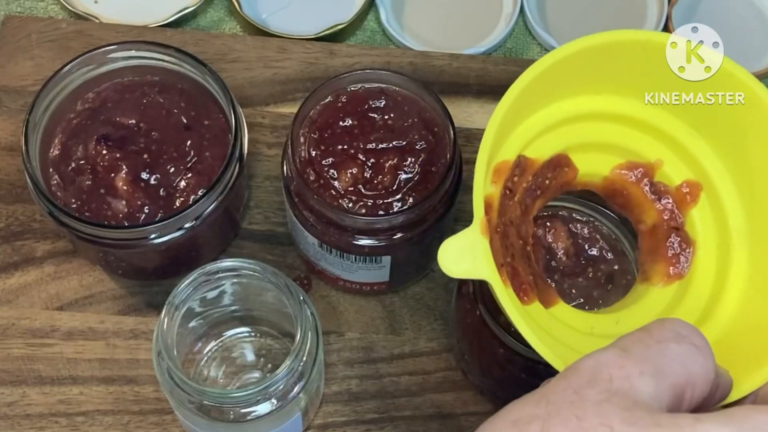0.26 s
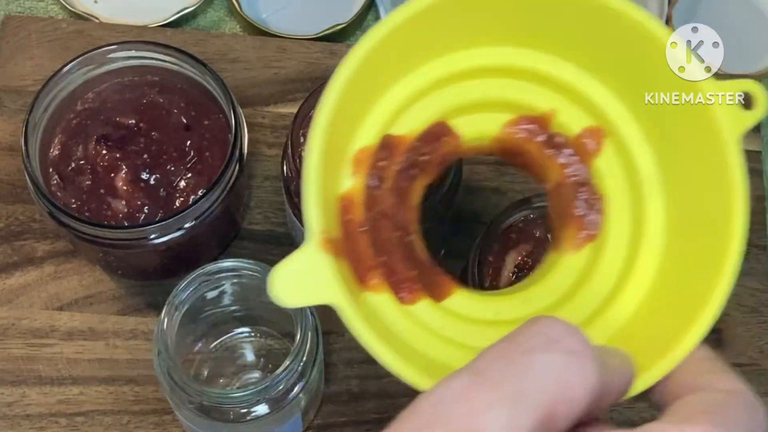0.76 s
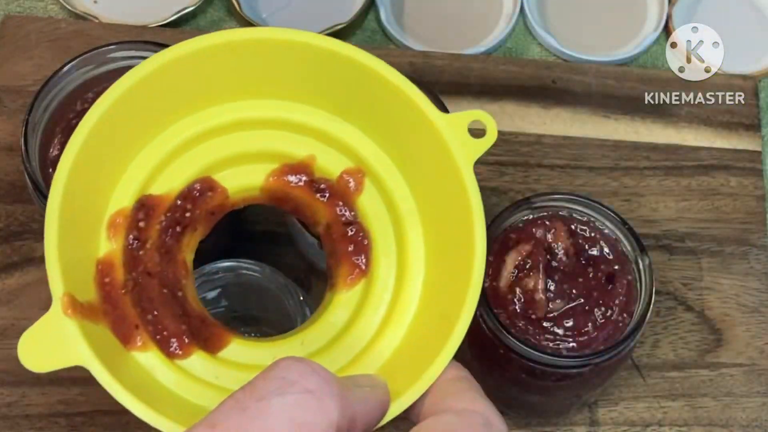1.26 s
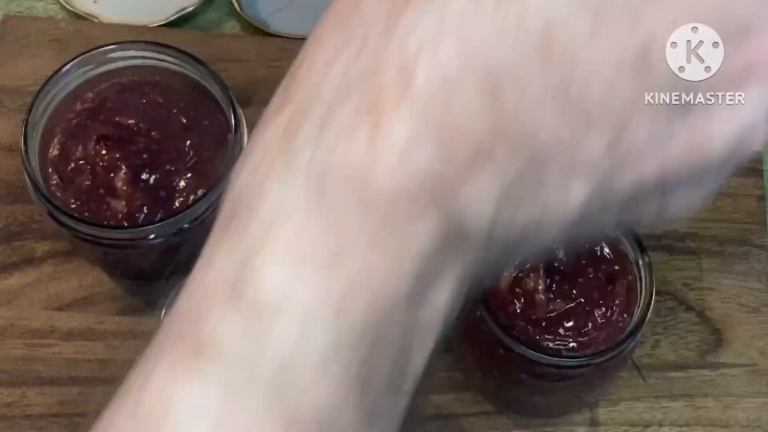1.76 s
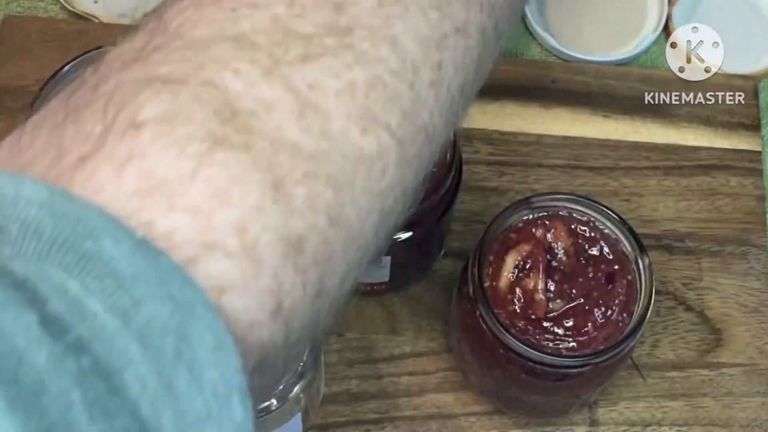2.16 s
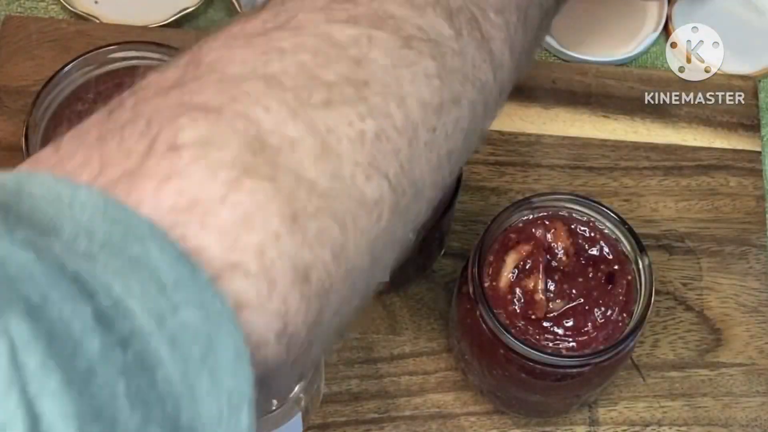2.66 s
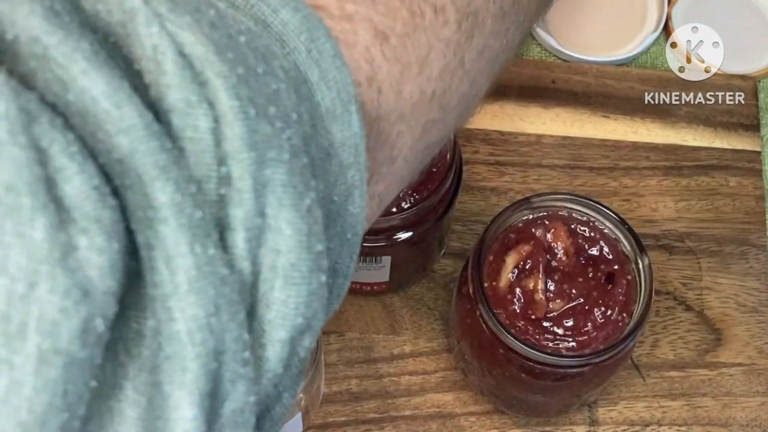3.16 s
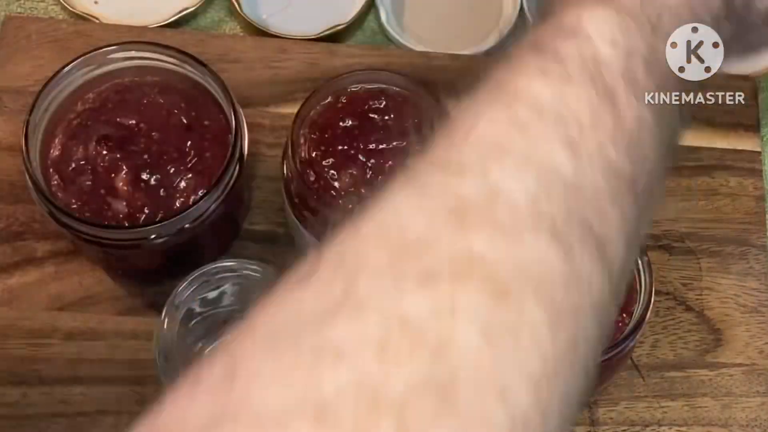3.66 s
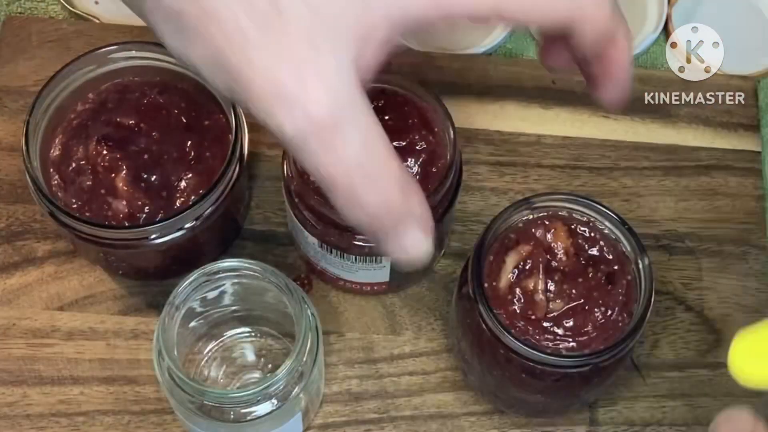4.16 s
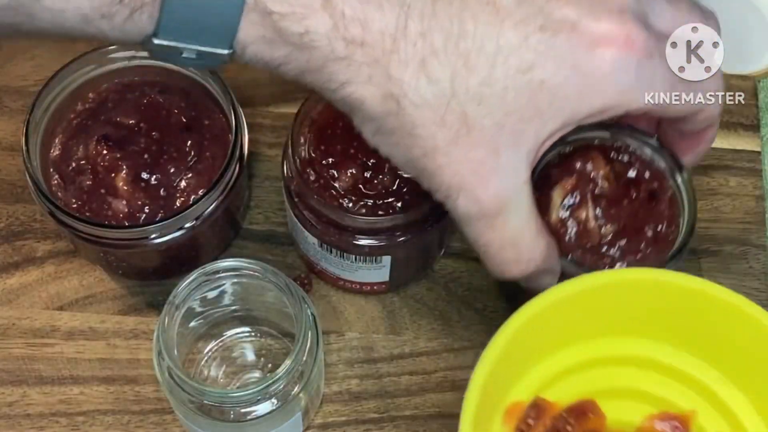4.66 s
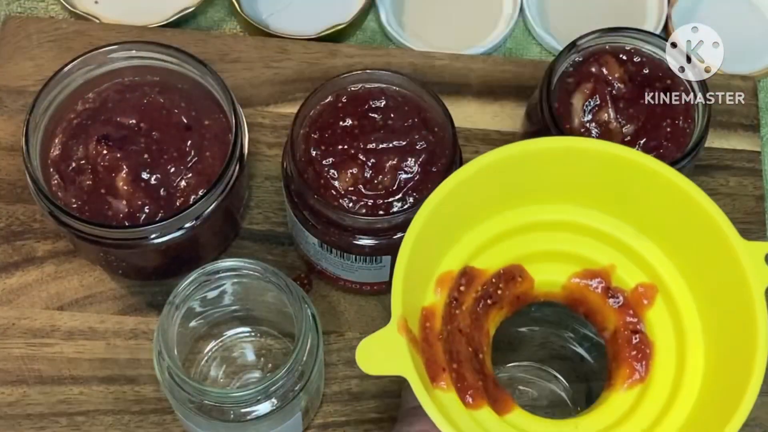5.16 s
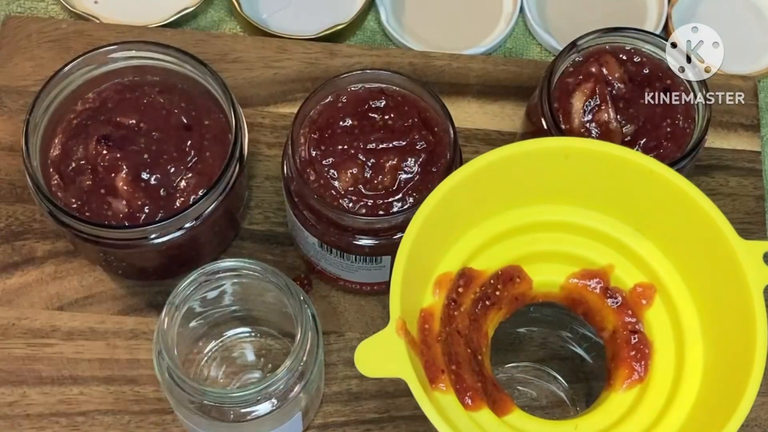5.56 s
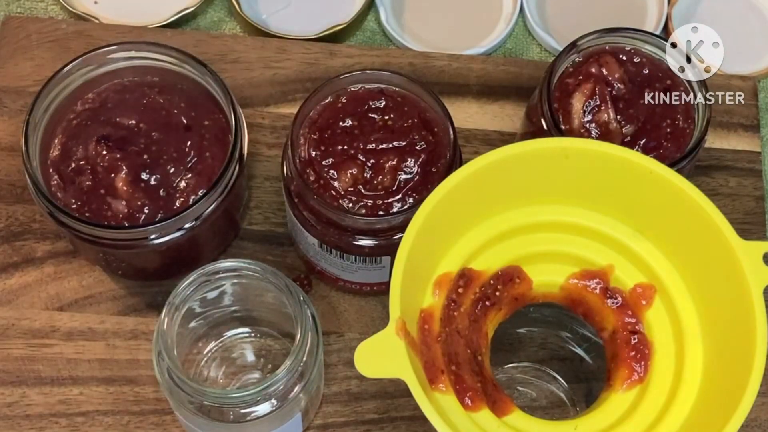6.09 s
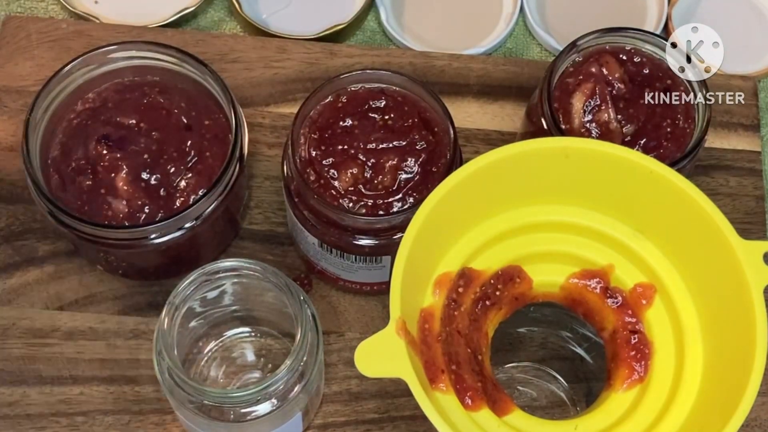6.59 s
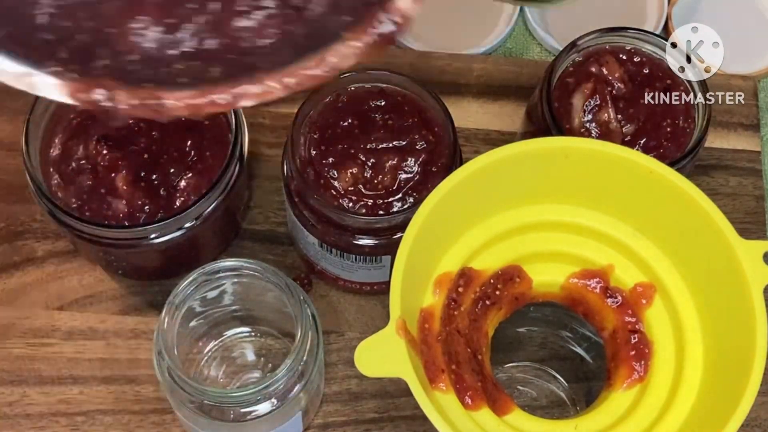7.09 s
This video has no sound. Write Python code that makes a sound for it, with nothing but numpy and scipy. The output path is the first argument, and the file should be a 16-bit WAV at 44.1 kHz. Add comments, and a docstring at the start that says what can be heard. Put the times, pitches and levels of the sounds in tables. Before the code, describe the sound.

Hollow knocks, a bright clatter and light taps, then a jar rasping along wood to a hard clink, softer thuds and ticks over low hum.

```python
"""Jam jars and a plastic funnel are moved about on a wooden board in a small kitchen; an appliance drones softly.
The funnel knocks on a jar, a faint airy fizz swells, things clatter down to one side, light taps and a scuff follow.
A full jar is pushed back until it touches its neighbours; an empty one is set down and nudged; a few ticks end it.
Contacts are filtered clicks, weight is half-sine pushes on board modes, scrapes are random slips through
resonances; glass is decaying sines, drone and hiss are shaped noise, and the room is a decaying stereo response."""
import sys
import numpy as np
from scipy import signal
from scipy.fft import rfft, irfft, next_fast_len
from scipy.io import wavfile
from scipy.ndimage import uniform_filter1d

SR = 44100
rng = np.random.default_rng(int(sys.argv[2]) if len(sys.argv) > 2 else 0)


def transcribe(u):
    """Save the signal u as a 16-bit wav file named by the first command-line argument.

    u: samples, shape (n,) or (channels, n), limited to [-1, 1]; the rate is SR.
    q: integer samples, one column per channel.
    """
    v = np.clip(np.atleast_2d(u).T, -1, 1)
    q = np.round(v * 32767).astype(np.int16)
    wavfile.write(sys.argv[1], SR, q)


N = 323253
PADDED = next_fast_len(N)
HZ = np.fft.rfftfreq(PADDED, 1 / SR)


def amp(db):
    """Decibels to gain."""
    return 10 ** (np.asarray(db) / 20)


def unit(x):
    """Scales to an rms of 1."""
    return x / np.sqrt(np.mean(x ** 2) + 1e-20)


def read(points, hz):
    """Reads a table on a log-frequency axis."""
    f, value = np.transpose(points)
    return np.interp(np.log(hz + 1), np.log(f + 1), value)


def add(mix, s, sound):
    """Adds a sound into the mix at time s."""
    part = mix[..., round(s * SR):][..., :sound.shape[-1]]
    part += sound[..., :part.shape[-1]]


def shaped(x, gain):
    """Filters a full-length signal by a gain for each frequency; rms 1."""
    return unit(irfft(rfft(x, PADDED) * gain, PADDED)[..., :N])


def convolved(x, response):
    """Passes a signal through a mono or stereo response."""
    return signal.fftconvolve(np.atleast_2d(x), np.atleast_2d(response), axes=1)[:, :N]


def noise_pair(same):
    """White noise in two channels with a given likeness at each frequency."""
    a, b = rfft(rng.standard_normal((2, PADDED)))
    same = np.clip(same, -1, 1)
    return irfft(np.array([a, same * a + np.sqrt(1 - same ** 2) * b]), PADDED)[:, :N]


def drift(hz):
    """Slow random motion up to a given rate; rms 1."""
    return shaped(rng.standard_normal(N), 1 / (1 + (HZ / hz) ** 4))


def background(hiss_db=-78.5, hiss_same=.3, waver_db=1.92, waver_hz=8):
    """The low drone of an appliance, wavering a little, and a smooth hiss."""
    # drone spectrum: hz, level_db
    drone_colour = [(25, -14.5), (40, -4.5), (50, 5.5), (62, -3), (95, -4), (130, -10), (300, -13.5),
                    (400, -11.5), (470, -4.5), (560, -4.5), (650, -11.5), (740, -23.5), (950, -23.5),
                    (2000, -91.5)]
    # left-right likeness of the drone: hz, likeness (-1 to 1)
    drone_same = [(60, 0.89), (150, 0.79), (380, 0.82), (950, 0.53), (2380, 0.59), (5980, -0.06),
                  (15000, 0.24)]
    # drone level before the waver: time_s, level_db
    drone_level = [(0, -62), (1.0, -63.5), (1.18, -68), (1.3, -58), (3.4, -59), (4.15, -61), (6.6, -56),
                   (7.2, -64)]
    # hiss spectrum: hz, level_db
    hiss_colour = [(300, -10), (900, 0), (1300, -1), (3000, -6), (7000, -7.5), (12000, -9), (14000, -13),
                   (16000, -18)]
    drone = shaped(noise_pair(read(drone_same, HZ)), amp(read(drone_colour, HZ)))
    level_db = np.interp(np.arange(N) / SR, *np.transpose(drone_level))
    hiss = shaped(noise_pair(hiss_same), amp(read(hiss_colour, HZ)))
    return amp(level_db + waver_db * drift(waver_hz)) * drone + amp(hiss_db) * hiss


def kitchen(x, first_s=.0013, early_db=5, early_s=0.0014, mono_hz=330):
    """Dense reflections from worktop and cupboards, then the room's tail; the bass is most alike on both sides."""
    # decay time of the room: hz, t60_s
    room_t60 = [(100, .45), (400, .44), (1500, .38), (4000, .32), (8000, .25), (15000, .19)]
    # spectrum of the room: hz, level_db
    room_colour = [(60, -16), (200, 0.5), (600, -18), (1500, -14), (4000, -12), (8000, -3.5), (15000, -6.5)]
    t = np.arange(SR * 3 // 4) / SR
    signs = rng.choice([-1., 1.], (2, len(t)))
    present = rng.random((2, len(t))) < 5000 / SR  # 5000 reflections per second
    taps = signs * present * (t > first_s)
    early = 1 + amp(early_db) * np.exp(-t / early_s)
    hz, when, z = signal.stft(taps * early, SR, nperseg=256)
    same = np.maximum(1 / (1 + (hz / mono_hz) ** 2), .25)[:, None]
    z[1] = same * z[0] + np.sqrt(1 - same ** 2) * z[1]
    z *= amp(read(room_colour, hz)[:, None] - 60 * when / read(room_t60, hz)[:, None])
    tail = signal.istft(z, SR, nperseg=256)[1]
    middle = abs(rfft(tail, SR))[:, 300:4000]  # 1 Hz bins: rms gain 1 over 300-4000 Hz
    return convolved(x, tail / np.sqrt(np.mean(middle ** 2)))


def strokes(rows, rise_s, stop_s):
    """Level of movements (start_s, end_s, level_db): each swells, holds and dies away."""
    t, power = np.arange(N) / SR, np.zeros(N)
    for start, end, db in rows:
        rise = np.sin(np.pi / 2 * np.clip((t - start) / rise_s, 0, 1)) ** 2
        stop = np.exp(-np.clip((t - end) / stop_s, 0, 20))
        power += (amp(db) * rise * stop) ** 2
    return np.sqrt(power)


def slips(per_s, spread_db, lumpy_db, lump_hz=35):
    """Tiny impulses, as of friction letting go, of random size, their size swelling in clumps."""
    lumps = drift(lump_hz)
    size_db = spread_db * np.minimum(rng.exponential(1, N), 4) + lumpy_db * lumps
    return amp(size_db) * rng.choice([-1, 1], N) * (rng.random(N) < per_s / SR)


def airy_fizz():
    """A faint, soft, airy fizz swells and stops: dense random impulses through a broad spectrum."""
    # fizz: start_s, end_s, level_db
    swells = [(1.78, 2.06, -66.5)]
    # spectrum of the fizz: hz, level_db
    fizz_colour = [(300, 9), (1000, 4), (2400, 3), (4500, 3), (6000, -1), (7500, -2), (9000, -9),
                   (12000, -8), (16000, -10)]
    level = strokes(swells, rise_s=.26, stop_s=.035)
    return level * shaped(slips(per_s=1800, spread_db=4.0, lumpy_db=3.5), amp(read(fizz_colour, HZ)))


def shift():
    """A short dull scuff of friction slips as something is shifted off to one side."""
    # scuff: start_s, end_s, level_db
    scuffs = [(3.11, 3.175, -55)]
    # spectrum of the scuff: hz, level_db
    scuff_colour = [(150, -14), (450, 1), (800, 1), (1400, -1), (2200, -12), (4000, -16), (6000, -30),
                    (12000, -40)]
    level = strokes(scuffs, rise_s=0.004, stop_s=0.023)
    return level * shaped(slips(per_s=2000, spread_db=1.5, lumpy_db=1), amp(read(scuff_colour, HZ)))


def scatter(count, decay_ms, size=4096):
    """Spectra (count, side, Hz) of a short decaying random spray, drawn separately for each side; energy 1."""
    ms = np.arange(size) * 1000 / SR
    spray = rng.standard_normal((count, 2, size)) * (1 - np.exp(-ms)) * np.exp(-ms / decay_ms)
    return rfft(spray / np.linalg.norm(spray, axis=2, keepdims=True))


def placed(x, lead_ms, left_db, scatter_db, decay_ms=3, scatter_hz=1100, size=4096):
    """A sound from the left reaches that side earlier and louder; its treble is also blurred by the spray."""
    f = np.fft.rfftfreq(size, 1 / SR)
    left = amp(left_db / 2) * np.ones(len(f))
    right = amp(-left_db / 2) * np.exp(-2j * np.pi * f * lead_ms / 1000)
    share = amp(scatter_db) * f / np.hypot(f, scatter_hz)
    response = np.array([left, right]) + share * scatter(1, decay_ms)[0]
    return convolved(x, irfft(response / np.hypot(1, share)))


def causal(gain):
    """The spectrum of the fastest-starting (minimum-phase) pulse that has this gain."""
    log_gain = np.log(np.maximum(gain, 1e-5))
    circle = np.concatenate([log_gain, log_gain[-2:0:-1]])
    return np.exp(np.conj(signal.hilbert(circle)))[:len(gain)]


def knocks(rows, low_cut, spread_ms, scatter_db, scatter_ms, scatter_hz=1300, sharpness=7, roll_off=3.2,
           echo=0.043, echo_ms=1.9, lean_db=1.0, lean_hz=1700, size=4096):
    """Each contact is a click with one short ring; soft ones lose treble. Returns direct sound and room feed."""
    # colour of a hard contact on the board: hz, level_db
    clack = [(100, 3.5), (400, 0), (1450, -3), (2100, -3.5), (3100, -6.5), (4400, -5), (5400, -16.5),
             (7200, -14.5), (8500, -28), (12000, -9), (16000, -31)]
    direct, feed, f = np.zeros((2, N)), np.zeros(N), np.fft.rfftfreq(size, 1 / SR) + 1
    # bending waves: the treble arrives first; spread_ms is the delay at 1 kHz
    dispersion = np.exp(-4j * np.pi * spread_ms * np.sqrt(f / 1000))
    edge = 1 - echo * np.exp(-2j * np.pi * f * echo_ms / 1000)  # echo off the board's edge
    # the midrange reaches the left side more strongly
    lean = amp(lean_db / np.hypot(1, 2 * (f / lean_hz - lean_hz / f)))
    sprays = 1 + amp(scatter_db) * f / np.hypot(f, scatter_hz) * scatter(len(rows), scatter_ms)
    for (s, db, hz, ring_db, cut_hz, room_db, lead_ms), spray in zip(rows, sprays):
        ring = 1 + amp(ring_db) / np.hypot(1, sharpness * (f / hz - hz / f))
        radiated = 1 / np.hypot(1, (low_cut * hz / f) ** 2)  # small things radiate little bass
        softness = np.hypot(1, (f / cut_hz) ** roll_off)
        spectrum = causal(amp(read(clack, f)) * ring * radiated / softness) * dispersion * edge
        right_lag = np.exp(-2j * np.pi * f * lead_ms / 1000)
        click = irfft([spectrum * lean, spectrum / lean * right_lag])
        click = click * amp(db) / abs(click[0]).max()
        add(direct, s, irfft(rfft(click) * spray))
        add(feed, s, click[0] * amp(room_db))
    return direct, feed


def handling_ticks():
    """Light handling taps that set no other object ringing: clicks with a blunt ring."""
    # taps: time_s, level_db, ring_hz, ring_db, contact_cutoff_hz, room_db, left_lead_ms
    taps = [ (3.1088, -33, 1280, 16, 2300, -11, .02), (3.1116, -40, 380, 10, 1200, -6, .1),
            (3.262, -56, 1200, 14, 1500, -8, 0), (3.461, -53, 1715, 15, 2190, -3, 0.016),
            (3.8026, -39.5, 1600, 18, 2500, -12, .09), (3.8182, -36, 1450, 12, 3400, -11, 0),
            (3.819, -45, 4000, 14, 4400, -12, 0), (3.8205, -34, 550, 16, 2000, -9, .1),
            (5.259, -54, 12000, 3, 15000, -14, 0), (5.7803, -55, 1650, 6, 14700, 6, .077),
            (6.202, -48, 10800, 3, 13900, -14, 0.017), (6.7252, -57, 7360, 3, 12020, 0, .012),
            (7.026, -41, 5500, 5, 12000, -11, 0), (7.284, -43.5, 11000, 3, 15200, -12, 0),
            (7.2905, -44, 7700, 8, 15000, -12, .1), ]
    return knocks(taps, low_cut=.6, spread_ms=.9, scatter_db=-4, scatter_ms=4, sharpness=4, roll_off=4)


def aside_clatter():
    """The funnel clatters as it is put down to one side: clicks with a longer treble-first sweep."""
    # contacts: time_s, level_db, ring_hz, ring_db, contact_cutoff_hz, room_db, left_lead_ms
    contacts = [ (2.3466, -14, 1200, 10, 8000, -9, .07), (2.3478, -19, 3200, 4.9, 6000, -12, 0.16),
                (2.3545, -19.5, 4080, 3.5, 6590, -9, 0.11), (2.3575, -23, 1350, 5.9, 2970, -15.5, 0.24),
                (2.36, -27.5, 660, 13, 1092, -7.5, 0.25), (2.3935, -31, 1170, 14, 4920, -2, 0.075),
                (2.398, -30, 730, 12, 1500, 4, 0.2), (2.4015, -27.5, 3370, 11, 4940, 6, 0.12),
                (2.4736, -33, 1950, 10, 4200, -10, .04), (2.4745, -30, 1100, 14, 1500, -8, .1),
                (2.503, -37, 1200, 10, 2030, -6, .24), (2.507, -40, 640, 18, 964, 5.5, 0.43), ]
    return knocks(contacts, low_cut=0.55, spread_ms=2.6, scatter_db=-7.5, scatter_ms=5)


def ring_on(blows, modes):
    """An object rings on after each knock; every mode reaches the two sides in its own phase."""
    t = np.arange(SR // 2) / SR
    phases = rng.uniform(-np.pi / 2, np.pi / 2, (len(modes), 2, 1))
    ring = sum(amp(db - 60 * t / t60) * np.sin(2 * np.pi * hz * t + p)
               for (hz, db, t60), p in zip(modes, phases))
    return convolved(blows, ring)


def aside_ring(blows, gain_db=-50):
    """Decaying modes that ring under the clatter to one side."""
    # modes: hz, level_db, t60_s
    aside_modes = [(689, -3, .13), (845, -2, .12), (1152, 3, .12), (1357, 0, .1), (1631, -2, .11),
                   (2455, -8, .13), (3149, -2, .15), (3295, -3, .14), (4339, -5, .15), (4592, -3, .15)]
    return amp(gain_db) * ring_on(blows, aside_modes)


def glassware_ring(blows, gain_db=-53):
    """Decaying modes of the glassware, driven by knocks and scrapes."""
    # modes: hz, level_db, t60_s
    glass_modes = [(680, 9, .16), (945, -5, .16), (1035, -4, .15), (1168, 0, .15), (1235, 0, .22),
                   (1463, -5, .18), (1619, -7, .2), (2335, -8, .2), (3161, -1, .22), (3466, -2, .22),
                   (3609, -2, .22), (4290, -1, .22)]
    return amp(gain_db) * ring_on(blows, glass_modes)


def clinks(width_hz=55):
    """Jar walls tick where they touch and sing thinly while they rub."""
    # glass ticking on glass: time_s, level_db, pitch_factor
    touches = [(4.8545, -62, 1), (5.259, -58, 1.03)]
    # a jar wall rubbing along its neighbour: start_s, end_s, level_db
    rubs = [(4.84, 5.11, -70.5)]
    # modes of a jar wall: hz, level_db, t60_s, left_lead_rad, rubbed_db
    jar_modes = [(3560, -3, .08, 0, -30), (9020, -3, .08, 3.1, -9), (12650, -8, .06, 1, -30),
                 (14790, 0, .07, 1.2, 0)]
    out, t = np.zeros((2, N)), np.arange(SR // 2) / SR
    pressure = strokes(rubs, rise_s=.04, stop_s=0.035)
    for hz, db, t60, lead, rubbed_db in jar_modes:
        lag = np.array([[0], [lead]])
        sing = shaped(rng.standard_normal(N), np.exp(-1j * lag) / (1 + ((HZ - hz) / width_hz) ** 2))
        out += amp(rubbed_db) * pressure * sing
        for s, level_db, pitch in touches:
            tone = np.sin(2 * np.pi * hz * pitch * t - lag)
            add(out, s, amp(level_db + db - 60 * t / t60) * tone)
    return out


def board_ring(pitch=1, lowest_db=0, second_db=0):
    """The board's answer to one sharp push; load and place shift its modes and weight the lowest two."""
    # modes of the board on its worktop, before shift and weighting: hz, level_db, t60_s
    board_modes = [(94.9, 1.5, 0.3), (118.46, -6, 0.56), (159.9, -4.5, 0.3), (174, -1, 0.16),
                   (220, -8, 0.09), (259, -10, 0.29), (283.6, -11.5, 0.3), (331, -1.5, 0.11),
                   (460, -4, 0.15), (580, -8.5, 0.25), (658, 2, 0.14), (914, 3, 0.33), (1266, -14, 0.37)]
    t = np.arange(SR * 3 // 4) / SR
    modes = [amp(db - 60 * t / t60) * np.sin(2 * np.pi * hz * pitch * t) for hz, db, t60 in board_modes]
    return amp(lowest_db) * modes[0] + amp(second_db) * modes[1] + sum(modes[2:])


def thumps(dead_db=3, low_hz=76, settle_s=.01, settle_db=-10):
    """Half-sine pushes: the board gives way, then rings; a long push wakes only the low modes."""
    # weight coming down: time_s, push_db, contact_ms, pitch_factor, lowest_mode_db, second_mode_db
    landings = [(1.474, -23.5, 2.46, 1, -8.5, 2.5), (1.495, -24.5, 2.7, 0.94, -6.5, -14),
                (1.512, -25.5, 3.1, 1.02, -20, -0.5), (1.572, -30.5, 4, .99, -14, 11.5),
                (1.728, -30.5, 3.2, 1, 1, 1), (1.775, -33, 2.4, 1, 3, 1), (1.955, -57, 2.8, 1, 2, -23),
                (2.049, -48.5, 2.3, 1.0, -2.5, -7), (2.192, -53, 5, 0.98, -1, 1),
                (2.352, -40, 6.3, .94, 8, -15), (2.471, -41.5, 8.4, .97, -8, -6),
                (2.553, -47.5, 3.13, 1, -7.5, -1), (5.883, -40.5, 3.6, 1.03, 4, -6),
                (5.92, -24, 3.57, 1.03, -6, -7), (5.936, -28.5, 2.44, 1.09, -19.5, -6),
                (6.004, -49, 4.5, 1.05, 0, 10), (6.061, -29, 4.3, 1.02, -1.5, -7),
                (6.126, -33, 3.25, 1.02, -7, 0), (6.2, -37, 2.85, 1.13, -7, -6)]
    motion = np.zeros(N)
    t_ms = np.arange(SR // 20) * 1000 / SR
    for s, db, ms, pitch, lowest_db, second_db in landings:
        push = np.sin(np.pi * np.minimum(t_ms / ms, 1))
        ring = signal.fftconvolve(push / push.sum(), board_ring(pitch, lowest_db, second_db))
        give = amp(dead_db) * np.sin(np.pi * t_ms / ms) * np.exp(-t_ms / (2 * ms))
        # a load lands on one edge, then drops flat
        for when, gain in (s, amp(db)), (s + settle_s, amp(db + settle_db)):
            add(motion, when, gain * ring)
            add(motion, when, gain * give)
    # below its lowest mode the board moves little air
    radiation = signal.butter(6, low_hz, "highpass", fs=SR, output="sos")
    return signal.sosfilt(radiation, motion)


def resonate(x, hz, width_hz):
    """A steep resonance that follows the curve hz; rms 1."""
    turn, r = np.exp(2j * np.pi * np.cumsum(hz) / SR), np.exp(-np.pi * width_hz / SR)
    return unit((turn * signal.lfilter([1], [1, -2 * r, r * r], x / turn)).real)


def shifting(x, depth_db, patch_hz=170, patch_s=.035):
    """As the contact point wanders round the foot, different resonances come forward and fall back."""
    z = signal.stft(x, SR, nperseg=512, noverlap=384)[2]
    field = rng.standard_normal(z.shape)
    for axis, steps in enumerate([patch_hz * 512 / SR, patch_s * SR / 128]):
        field = uniform_filter1d(field, max(round(steps), 1), axis)
    return unit(signal.istft(z * amp(depth_db * unit(field)), SR, nperseg=512, noverlap=384)[1][:N])


def slide(rows, colour, catches, rise_s, stop_s, ring_db, judder_hz, grip_db,
          wander=0.057, width=0.075, grip_hz=45, grip_below_hz=2200):
    """A glass foot slips on the grain: slips rasp, chatter at a wandering pitch, ring the board, shake the top."""
    start, end, scrape_db, judder_db = np.transpose(rows)[:4]
    gain = amp(read(colour, HZ))
    ringing = convolved(catches, board_ring(lowest_db=-4))[0]
    grain = shifting(shaped(catches, gain), depth_db=2.5)
    rasp = grain + amp(ring_db) * shaped(ringing, gain * HZ / (HZ + 400))
    # the grip comes and goes, and the body of the rasp with it
    body = irfft(rfft(rasp, PADDED) / (1 + (HZ / grip_below_hz) ** 4), PADDED)[:N]
    rasp = rasp - body + body * unit(amp(grip_db * drift(grip_hz)))
    shake_band = (HZ / 65) ** 4 / (1 + (HZ / 65) ** 4) / np.hypot(1, (HZ / judder_hz) ** 4)
    shake = shaped(ringing, shake_band)
    shake /= np.sqrt(uniform_filter1d(shake ** 2, size=4000) + 0.015)  # the hand keeps a steady pressure
    scrape = strokes(zip(start, end, scrape_db), rise_s, stop_s)
    judder = strokes(zip(start, end, judder_db), rise_s, stop_s)
    bend = 1 + wander * drift(29)
    chatter = sum(strokes([(a, b, db)], rise_s, stop_s) * resonate(catches, hz * bend, width * hz)
                  for a, b, _, _, hz, db in rows)
    return scrape * rasp + chatter, judder * shake


def nudge_jar():
    """The empty jar is nudged into place by light slips. Returns scrape and shake."""
    # nudges: start_s, end_s, scrape_db, judder_db, chatter_hz, chatter_db
    nudges = [(6.03, 6.1, -64, -44, 1240, -75), (6.103, 6.145, -51, -40.5, 4070, -61),
              (6.115, 6.17, -50.5, -53, 1264, -57.5), (6.2, 6.262, -58, -42, 3000, -64),
              (6.285, 6.345, -69.5, -46, 2180, -73)]
    # spectrum of the rasp: hz, level_db
    nudge_colour = [(180, -24), (400, 0), (600, 2), (760, 6), (1120, 7.5), (1260, 13), (1400, 3),
                    (2800, -1.5), (3900, 0.5), (5000, -3), (6000, -10.5), (7500, -10), (8800, -19.5),
                    (15000, -17)]
    light_slips = slips(per_s=1800, spread_db=2.8, lumpy_db=2)
    return slide(nudges, nudge_colour, light_slips, rise_s=0.028, stop_s=0.018,
                 ring_db=-29, judder_hz=204, grip_db=-2)


def push_jar():
    """The full jar is shoved across the board by dense slips. Returns scrape and shake."""
    # shoves: start_s, end_s, scrape_db, judder_db, chatter_hz, chatter_db
    shoves = [(4.475, 4.69, -38, -40, 603, -45.5), (4.67, 4.82, -35, -48, 606, -40.5),
              (4.8, 4.94, -45, -45, 656, -46.5), (4.98, 5.11, -47, -47, 716, -55)]
    # spectrum of the rasp: hz, level_db
    push_colour = [(150, -14), (215, -0.5), (380, -3.5), (640, 1), (740, -2), (1000, 0), (1400, -9.5),
                   (2100, -13), (3200, -25), (5000, -40), (7500, -40), (9000, -53.5), (11000, -39),
                   (15000, -52)]
    heavy_slips = slips(per_s=2400, spread_db=2.4, lumpy_db=.8)
    return slide(shoves, push_colour, heavy_slips, rise_s=.185, stop_s=.07,
                 ring_db=-13, judder_hz=99, grip_db=2.5)


def board_knocks():
    """Funnel and jars knock on the board: clicks with one ring each."""
    # contacts: time_s, level_db, ring_hz, ring_db, contact_cutoff_hz, room_db, left_lead_ms
    contacts = [ (1.454, -42.5, 1490, -2.5, 1700, 16.5, 0.18), (1.4699, -19.5, 1330, 15, 3600, 2.5, 0.17),
                (1.4718, -15, 590, 16, 4060, -2.5, 0.4), (1.481, -26.5, 2300, 7.5, 2800, 0.5, 0.55),
                (1.4915, -21, 910, 15, 2026, -8, 0.41), (1.503, -27, 340, 7.5, 1490, -4.5, 0.27),
                (1.516, -31, 470, 24.5, 2400, -1.5, 0.34), (1.526, -38.5, 1260, 1, 2400, 10, 0.37),
                (1.7179, -34, 936, 7, 3300, 1, 0.32), (1.721, -32.5, 573, 24, 840, 5, 0.37),
                (1.7235, -31, 915, 2, 1070, 0.5, 0.2), (4.604, -27, 605, 10.5, 1200, -8.5, 0.11),
                (4.645, -32.5, 520, 1, 2740, -5, 0.098), (4.669, -27.5, 624, 19, 1300, 4, 0.12),
                (4.6955, -22, 660, 4.5, 1204, -2, 0.063), (4.7, -25.5, 1030, 16, 1170, 1, 0.11),
                (4.757, -20.5, 940, 5.5, 1300, -4.5, .1), (4.804, -27, 606, 5.5, 1200, -2.5, .1),
                (4.82, -29.5, 400, 5.5, 1000, 2.5, 0.092), (4.8458, -11, 790, 16, 1800, -12, .16),
                (4.858, -27, 1050, 8.5, 1500, -18.5, .12), (4.865, -27, 715, 34.5, 924, -9.5, .08),
                (4.8543, -27.5, 3900, -8, 6760, -10.5, 0.016), (5.105, -33.5, 1060, -1, 2890, -20, 0.14),
                (5.882, -48, 477, 10, 680, 12, 0.63), (5.916, -33, 463, 19, 3000, 1.5, 0.3),
                (5.922, -32, 910, 31, 2400, -1, 0.31), (5.927, -32, 575, 13, 910, 3, 0.25),
                (6.05, -42, 497, 19, 1180, 9.5, .39), (6.265, -32.5, 2850, 1, 3760, -3, 0.14), ]
    return knocks(contacts, low_cut=0.58, spread_ms=1.3, scatter_db=-6, scatter_ms=3)


def scene(thump_room_db=-15, slide_room_db=-3, clink_room_db=-14, slide_glass_db=-6):
    """Everything on and beside the board, heard directly and through the room."""
    fizz, scuff, glass, boom = airy_fizz(), shift(), clinks(), thumps()
    ticks, tick_feed = handling_ticks()
    aside, aside_feed = aside_clatter()
    nudge, nudge_shake = nudge_jar()
    push, push_shake = push_jar()
    on_board, board_feed = board_knocks()
    scrapes = push + nudge
    near = placed(push, lead_ms=0.014, left_db=4.0, scatter_db=-0.5)
    near += placed(nudge + nudge_shake, lead_ms=.3, left_db=2, scatter_db=-7)
    near += placed(scuff, lead_ms=.05, left_db=1, scatter_db=0)
    near += placed(boom, lead_ms=.22, left_db=0, scatter_db=-5)
    ringing = glassware_ring(on_board[0] + amp(slide_glass_db) * scrapes) + aside_ring(aside[0])
    feed = board_feed + aside_feed + tick_feed + fizz  # the fizz is heard through the room only
    feed = feed + amp(thump_room_db) * boom + amp(slide_room_db) * (scrapes + scuff)
    room = kitchen(feed + amp(clink_room_db) * glass[0])
    return on_board + aside + ticks + ringing + glass + near + push_shake + room + background()


def record(dry, edge_hz=15900):
    """Band limit: a steep linear-phase low-pass."""
    low_pass = signal.firwin(511, edge_hz, window=("kaiser", 9), fs=SR)
    return signal.oaconvolve(dry, low_pass[None], "same", axes=1)


dry = scene()
out = record(dry)
transcribe(out)
```